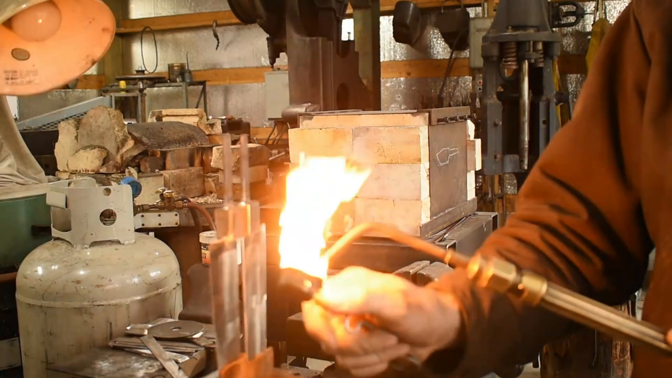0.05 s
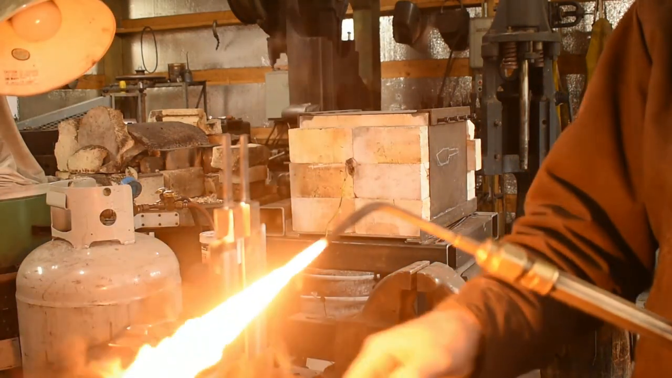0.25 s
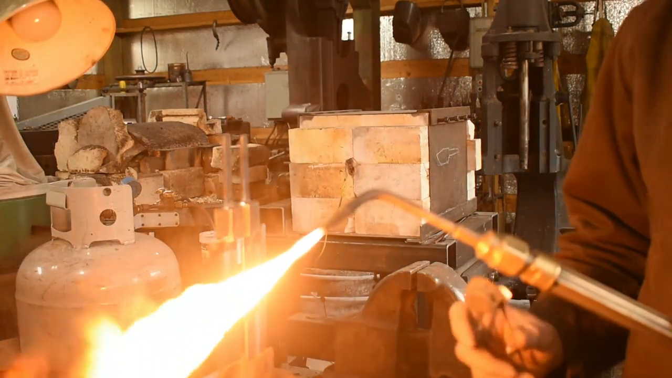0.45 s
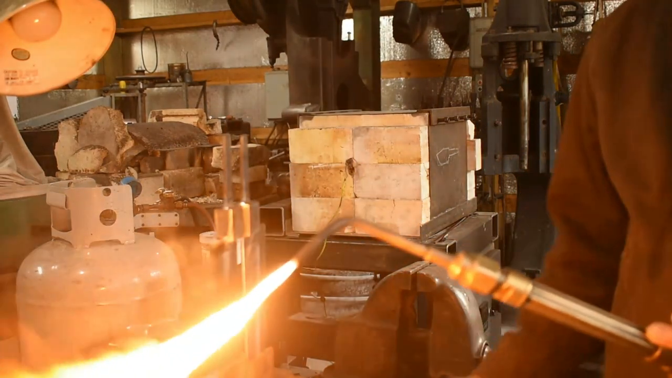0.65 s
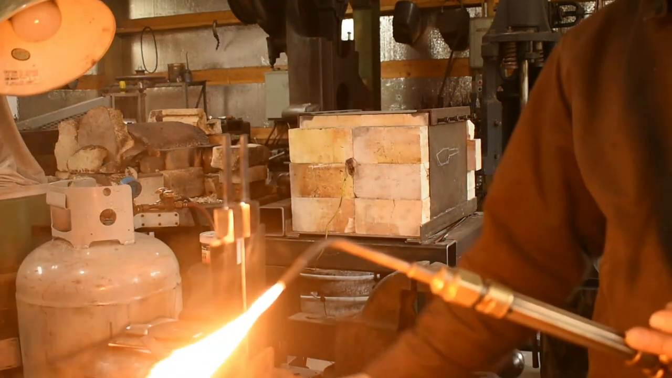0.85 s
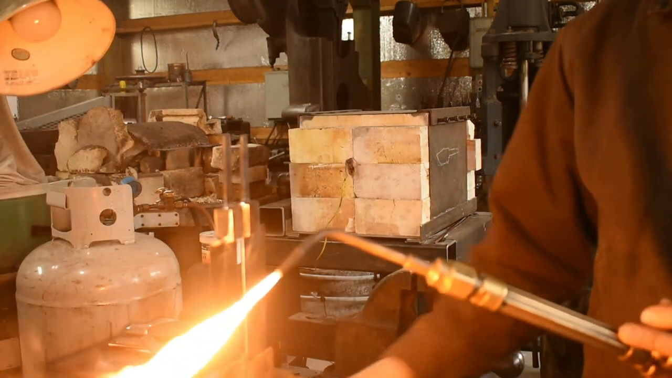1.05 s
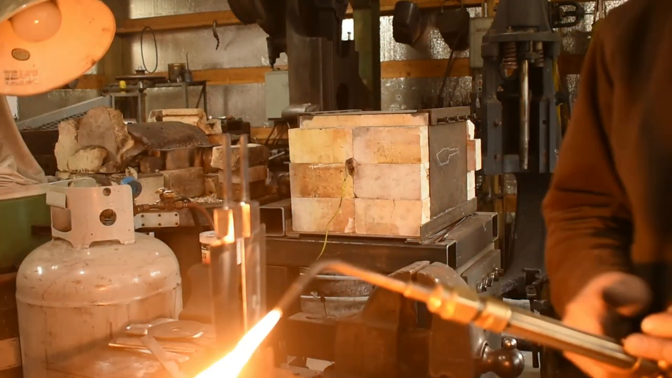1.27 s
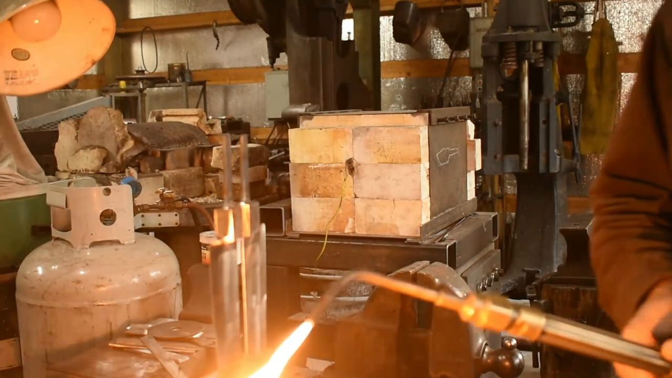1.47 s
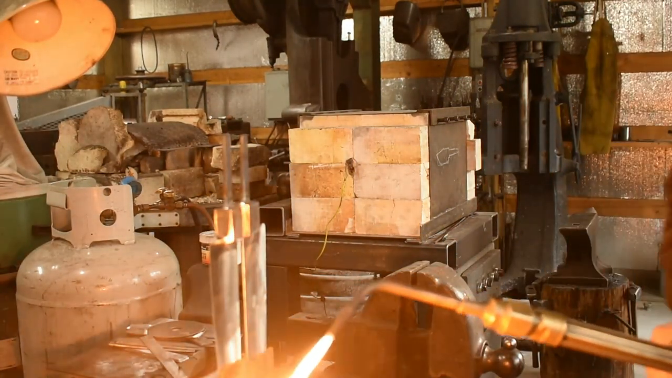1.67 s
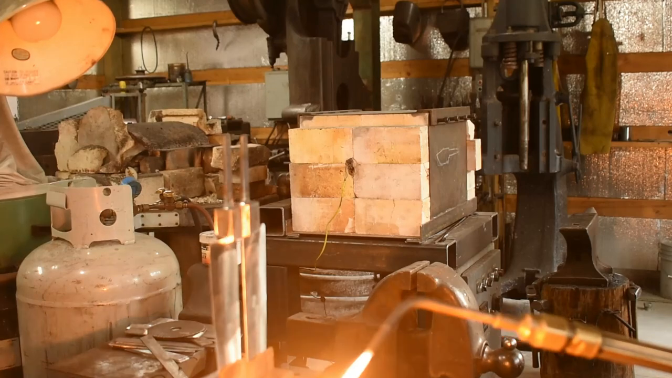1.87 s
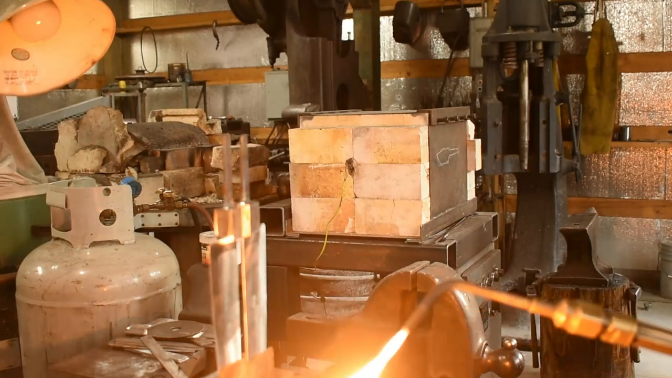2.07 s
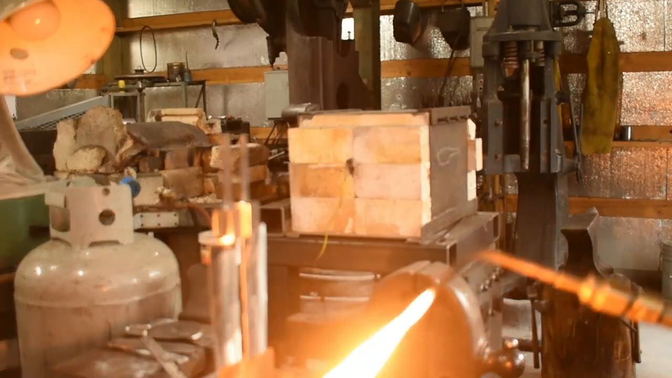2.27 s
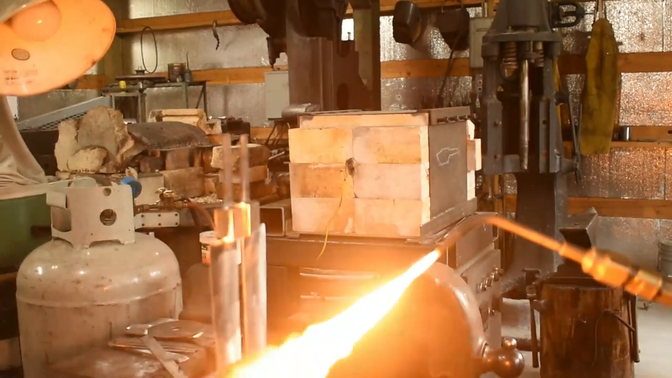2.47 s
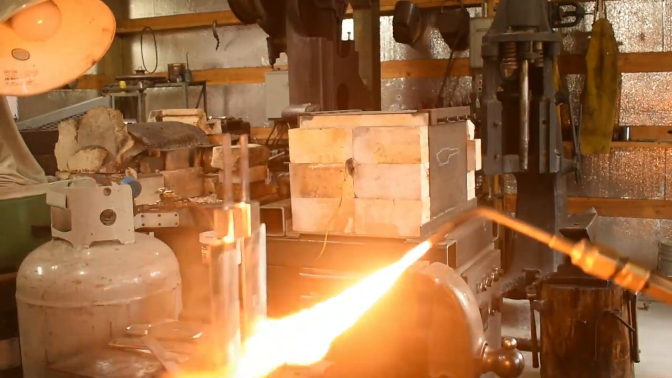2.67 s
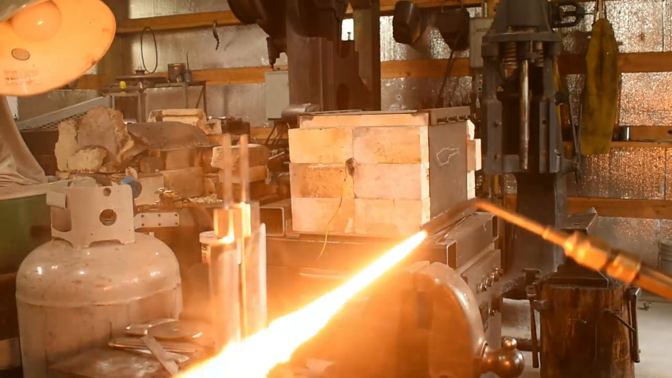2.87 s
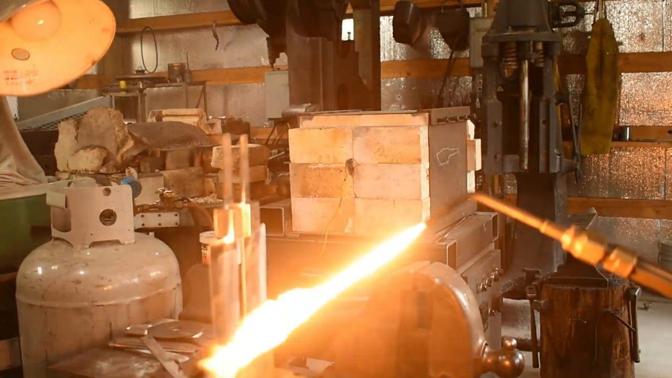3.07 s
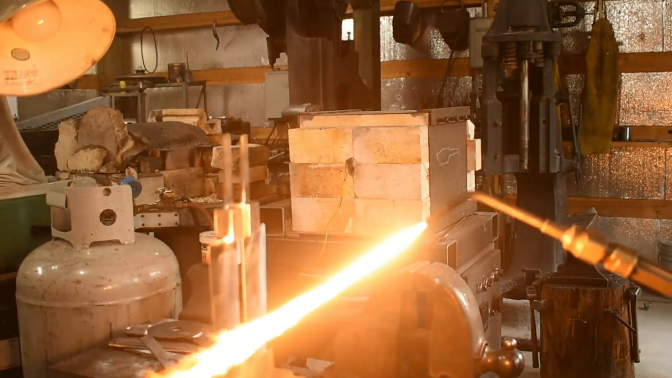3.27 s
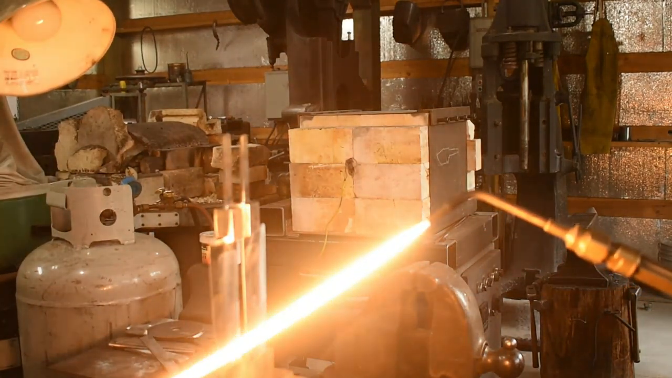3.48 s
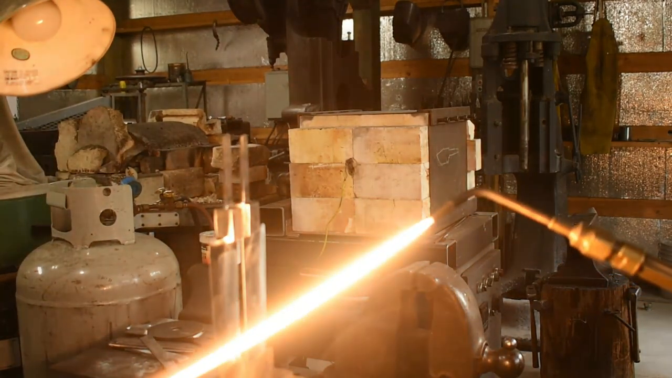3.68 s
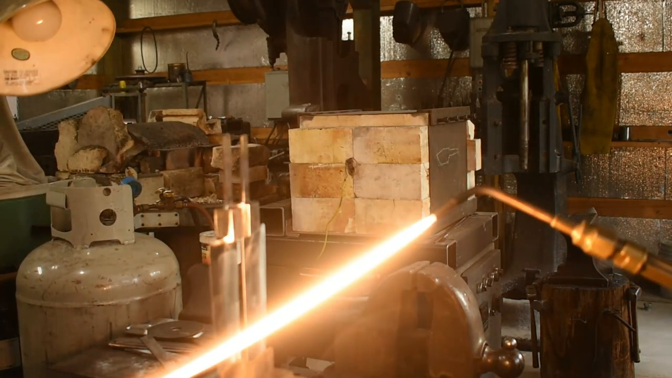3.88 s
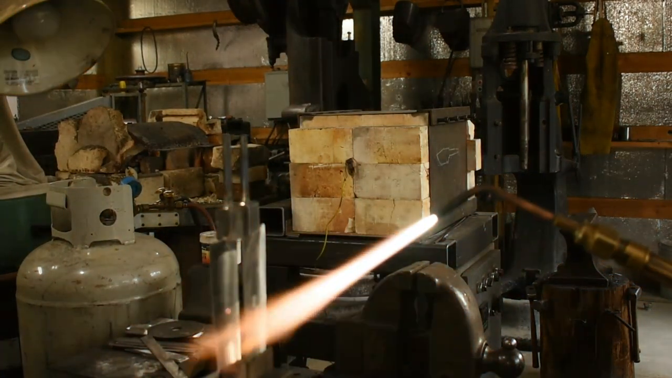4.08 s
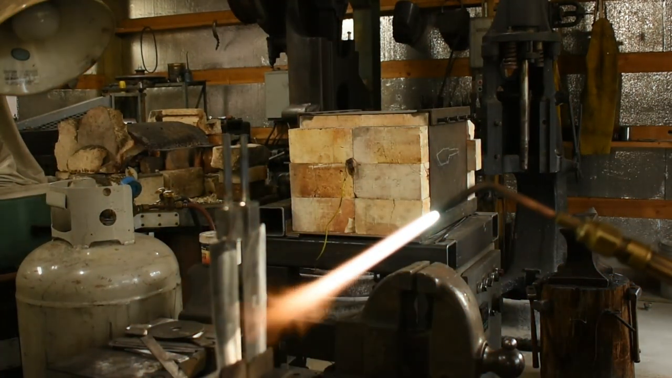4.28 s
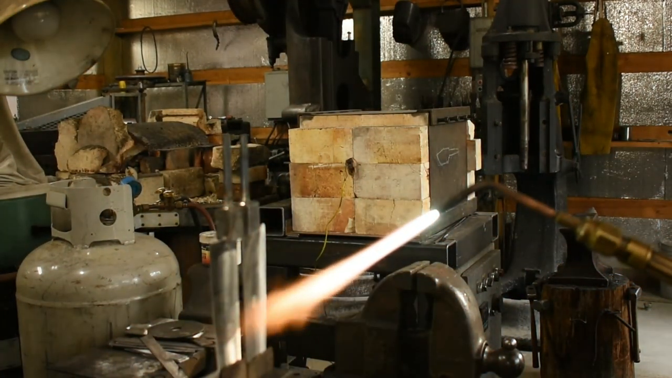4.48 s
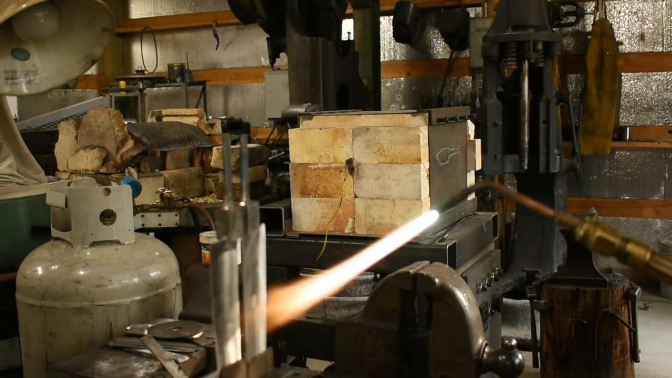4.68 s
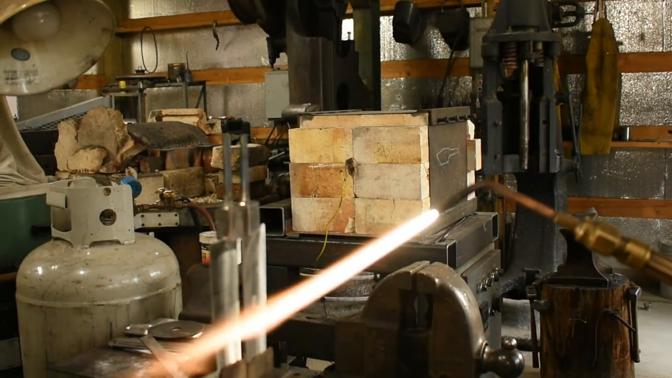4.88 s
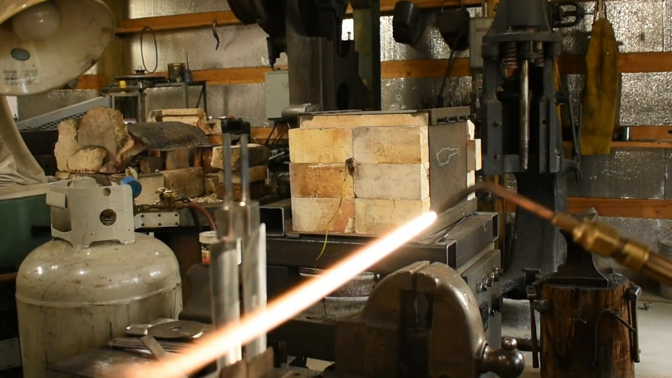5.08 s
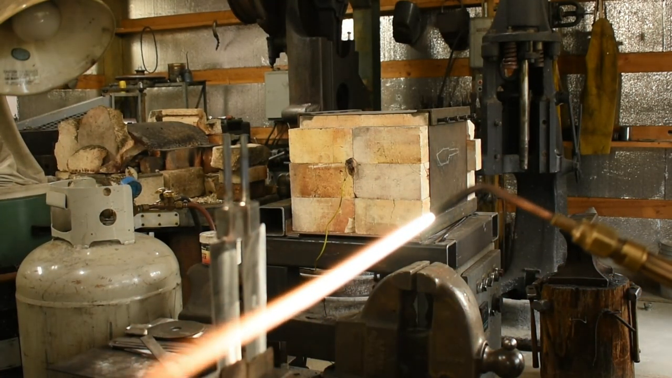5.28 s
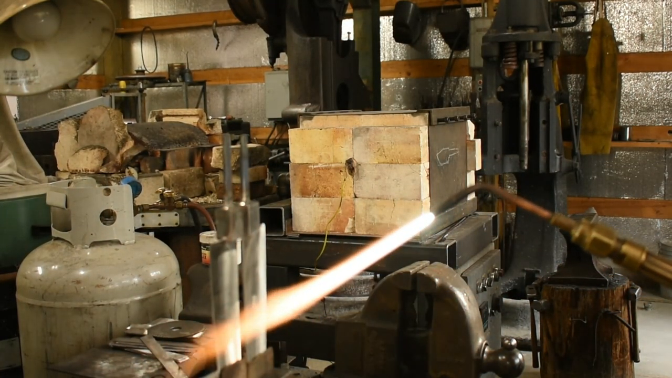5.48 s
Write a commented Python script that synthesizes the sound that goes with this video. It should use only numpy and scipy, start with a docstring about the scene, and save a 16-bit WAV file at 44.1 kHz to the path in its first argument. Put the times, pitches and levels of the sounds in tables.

```python
"""Lighting a gas torch

In a workshop, a flint striker scrapes, the gas goes off with a loud pop, and a flame roars softly.
The striker is dropped and clatters on the steel bench. As the valves are turned the flame sputters,
the nozzle whistles briefly and the flame settles to a quiet hiss. A near echo shifts as the torch moves."""
import sys
import numpy as np
from scipy import signal
from scipy.fft import rfft, irfft
from scipy.io import wavfile
from scipy.ndimage import uniform_filter1d, map_coordinates

SR = 44100
rng = np.random.default_rng(int(sys.argv[2]) if len(sys.argv) > 2 else 0)


def bounce(signal):
    """Save signal as a 16-bit WAV file at the path given by the first command-line argument."""
    frames = np.transpose(np.atleast_2d(signal))
    limited = np.clip(frames, -1, 1)
    pcm = np.round(limited * 32767).astype(np.int16)
    wavfile.write(sys.argv[1], SR, pcm)


N = 244446
TIME = np.arange(N) / SR
LIT_S = 0.067  # when the gas catches fire


def gain_of(db):
    """Turns decibels into a number to multiply by."""
    return 10 ** (np.asarray(db) / 20)


def evened(x):
    """Scales a signal to an average power of 1."""
    return x / np.sqrt(np.mean(x ** 2) + 1e-20)


def read(points, hz):
    """Looks up a frequency in a table, blending between rows on a log scale."""
    frequencies, values = np.transpose(points)
    return np.interp(np.log(hz + 1), np.log(frequencies + 1), values)


def follow(rows):
    """Joins a table's timed points into one curve per column."""
    times, *columns = np.transpose(rows)
    return [np.interp(TIME, times, column) for column in columns]


def gate(start, end, attack_s, release_s):
    """Fades in from 0 to 1, holds until the end, then fades out."""
    return np.clip((TIME - start) / attack_s, 0, 1) * np.clip(1 - (TIME - end) / release_s, 0, 1)


def add(mix, start_s, sound):
    """Mixes a sound in at the given time."""
    part = mix[round(start_s * SR):][:len(sound)]
    part += sound[:len(part)]


def noise(spectrum):
    """Steady noise with the given tone colour (its balance of low and high)."""
    gains = gain_of(read(spectrum, np.fft.rfftfreq(N, 1 / SR)))
    return evened(irfft(rfft(rng.standard_normal(N)) * gains, N))


def colour(x, spectrum, size=4096):
    """Gives a sound a tone colour while keeping its sudden starts sharp."""
    log_gain = np.log(gain_of(read(spectrum, abs(np.fft.fftfreq(size, 1 / SR)))))
    response = np.exp(np.conj(signal.hilbert(log_gain)))  # minimum phase: nothing sounds early
    taps = np.fft.ifft(response).real[:size // 2]
    return signal.oaconvolve(x, taps / np.linalg.norm(taps))[:N]


def wander(hz):
    """A smooth random wobble, up to about hz changes a second."""
    smoothing = np.exp(-(np.fft.rfftfreq(N, 1 / SR) / hz) ** 2)
    return evened(irfft(rfft(rng.standard_normal(N)) * smoothing, N))


def burst(decay_s):
    """A puff of noise that starts at once and dies away."""
    t = TIME[:SR // 10]
    return rng.standard_normal(len(t)) * np.exp(-t / decay_s)


def ring(tones, detune=.004):
    """A struck object rings with its own fading tones, a little differently at each blow."""
    t = TIME[:SR]
    phases = rng.random(len(tones))
    shifts = 1 + detune * rng.standard_normal(len(tones))
    return sum(gain_of(db - 60 * t / fade_s) * np.sin(2 * np.pi * (hz * shift * t + phase))
               for (hz, db, fade_s), phase, shift in zip(tones, phases, shifts))


# tone colour of the flowing gas: (frequency [Hz], level [dB])
FLOW_COLOUR = [(25, -14), (60, -14), (100, -25), (220, -16.5), (420, 1.5), (700, -0.5), (1200, -3.5),
               (2000, -9.5), (3000, -17.5), (4000, -15), (6500, -26), (15000, -37)]
def gas_flow(level_db=-53):
    """Cold gas rushes softly out of the tip the whole time."""
    return gain_of(level_db) * noise(FLOW_COLOUR)


def flint_stroke(start, length, db, swell_db, grip_s=.0027, slip_s=.0023):
    """How hard the flint rubs: it grips, swells or eases along the file, and slips off."""
    t = TIME - start
    along = np.clip(t / length, 0, 1)
    grip = np.clip(t / grip_s, 0, 1)
    slip = np.exp(-np.maximum(t - length, 0) / slip_s)
    return grip * gain_of(db + swell_db * (along - 1)) * slip


# a touch and a stroke each way: (start [s], length [s], final level [dB], swell on the way [dB])
FLINT_STROKES = [(0.029, 0.0036, -46.5, 3), (.058, .013, -25, -7.5), (0.165, .004, -41, 3),
                 (.182, .027, -22, 19.5)]
# tone colour of flint on the file: (frequency [Hz], level [dB])
SCRAPE_COLOUR = [(500, -34), (2000, -2.5), (3200, 0), (4700, 3), (6000, -10), (7500, -9), (10000, -13),
                 (16000, -17)]
def striker(cup_hz=7330, cup_decay_s=.0019, cup_db=-1, freed_s=.16, grit_db=1.1, room_db=-11):
    """Flint grates over the file and rings the striker's steel cup."""
    rubbing = gain_of(grit_db * wander(hz=700)) * sum(flint_stroke(*row) for row in FLINT_STROKES)
    keep = np.exp(-2 / (cup_decay_s * SR))
    stored_energy = signal.lfilter([1 - keep], [1, -keep], rubbing ** 2 + 1e-18)
    freed = np.where(TIME > freed_s, 1, .4)  # the closed hand muffles the cup until the return stroke
    cup = gain_of(cup_db) * freed * np.sqrt(stored_energy) * np.sin(2 * np.pi * cup_hz * TIME)
    dry = rubbing * noise(SCRAPE_COLOUR) + cup
    return dry + gain_of(room_db) * workshop_echo(dry)


# the gas cloud goes off in two quick thumps: (time [s], strength [dB])
THUMPS = [(0.0672, 18), (0.0703, 12)]
# tone colour of the bang: (frequency [Hz], level [dB])
BANG_COLOUR = [(30, -52), (90, -30.5), (140, -1.5), (190, 8), (320, -4), (600, 4), (1450, -5.5),
               (2100, 3.5), (3000, -9), (4500, -22), (7000, -47), (16000, -60)]
# what the bang sets booming in the workshop: (frequency [Hz], level [dB], time to fade 60 dB [s])
BOOM_TONES = [(139.6, -3, 0.29), (188.5, 5, 0.1), (232, -8, 0.28), (308, 1.5, 0.14), (473, 1, 0.22),
              (866, 13, 0.062), (1200, 9, 0.065), (2140, -5, 0.26)]
def ignition(rush_db=-25, rush_s=.0058, boom_db=-23, room_db=-8):
    """Each thump is a pressure spike with a short rush of air behind it; the workshop booms."""
    blast, boom = np.zeros((2, N))
    for s, db in THUMPS:
        add(blast, s, gain_of([db]))
        add(blast, s, gain_of(db + rush_db) * burst(rush_s))
    add(boom, LIT_S, gain_of(boom_db) * ring(BOOM_TONES))
    dry = colour(blast, BANG_COLOUR)
    return dry + boom + gain_of(room_db) * workshop_echo(dry)


# tone colour of the yellow flame, rich in fuel: (frequency [Hz], level [dB])
RICH_COLOUR = [(30, -25), (70, -35), (110, -19), (150, -16.5), (200, -8), (255, -7.5), (315, 1), (410, -1),
               (660, -0.5), (900, 1), (1250, -4.5), (1550, -3.5), (2200, -11), (5000, -73)]
# tone colour of the lean flame, which has more oxygen: (frequency [Hz], level [dB])
LEAN_COLOUR = [(30, -31), (80, -26), (140, -12), (210, -4.5), (260, -2.5), (340, 2.5), (480, -2.5),
               (690, -4.5), (950, -1), (1500, -20.5), (4000, -47)]
def roar(rich_db=-36.5, peak_s=1.5, lean_db=-45.5, lean_start_s=4.12, flutter_db=1.6, murmur_db=-61.5):
    """The flame roars broadly until the gas is turned down; more oxygen brings a deeper, hollow roar."""
    rich_level = rich_db - 1.37 * abs(TIME - peak_s)  # 1.37 dB a second, up and then down
    rich = gate(LIT_S, 3.37, attack_s=.15, release_s=.13) * gain_of(rich_level)
    lean_level = lean_db - 5.5 * (TIME - lean_start_s) + flutter_db * wander(hz=20)
    lean = gate(lean_start_s, 4.92, attack_s=.074, release_s=.1) * gain_of(lean_level)
    lean = np.hypot(lean, gain_of(murmur_db))  # a murmur of it is always there
    return rich * noise(RICH_COLOUR) + lean * noise(LEAN_COLOUR)


# the flame at the tip as the valves are turned: (time [s], rasp level [dB], hiss level [dB])
TIP_LEVELS = [(.35, -48.5, -63), (1.02, -40, -55.5), (1.68, -44, -55.5), (1.9, -39, -59), (2.3, -44, -59.5),
              (2.7, -45, -60), (2.92, -38, -55.5), (3.17, -44.5, -62.5), (3.5, -40.5, -65),
              (4.07, -42.5, -60), (4.18, -53, -47), (4.32, -47, -44), (4.72, -48.5, -48), (5.1, -54, -57.5),
              (5.52, -62.5, -68.5)]
# brief flare-ups: (time [s], half length [s], roar change [dB], rasp change [dB], hiss change [dB])
FLARE_UPS = [(.55, 0.036, 0.5, 3, 4.5), (2.818, 0.045, 7, 6, 11), (3.116, 0.058, 1, 0, 9.5),
             (3.326, 0.03, -1, 5, 3), (4.025, .05, -3, 1.5, 6), (4.368, 0.0099, 7, -5, 0),
             (4.93, 0.018, 4.5, -3, 0), (5.21, 0.028, 0, 0, 7)]
# tone colour of the rasp at the tip: (frequency [Hz], level [dB])
RASP_COLOUR = [(100, -56), (300, -49), (1000, -9), (1550, -3), (1850, 4), (2400, 3.5), (3100, -1.5),
               (4000, -4), (4900, -8.5), (6000, -19.5), (9000, -39), (16000, -68)]
# tone colour of the hissing jet: (frequency [Hz], level [dB])
HISS_COLOUR = [(100, -50), (1000, -45), (2500, 1.5), (4000, 8), (5500, 4.5), (7000, 2), (9000, -2),
               (11000, -6.5), (14000, -14.5), (16000, -32)]
def flame(hiss_boost_db=1.5, flutter_db=1.0, drift_db=.5, grow_s=.14):
    """Swirling, burning gas roars, flares and flutters, with a rasp and a hiss at the tip."""
    rasp_db, hiss_db = follow(TIP_LEVELS)
    roar_rise, rasp_rise, hiss_rise = sum(np.outer(rises, np.exp(-((TIME - s) / half_s) ** 2))
                                          for s, half_s, *rises in FLARE_UPS)
    body = gain_of(roar_rise) * roar()
    crackle, fizz = sputtering() * rng.standard_normal((2, N))
    rasp = gain_of(rasp_db + rasp_rise) * colour(crackle, RASP_COLOUR)
    hiss = gain_of(hiss_db + hiss_boost_db + hiss_rise) * colour(fizz, HISS_COLOUR)
    alight = np.clip((TIME - LIT_S) / grow_s, 0, 1)
    flutter = gain_of(flutter_db * wander(hz=35))
    drift = gain_of(drift_db * wander(hz=5))
    return alight * flutter * (body + drift * (rasp + hiss))


# the striker lands, rocks and falls flat: (time [s], strength [dB], share that is a dull knock [0-1])
BOUNCES = [(1.103, -26, 0), (1.107, -3.5, 0.01), (1.112, 0.5, 0.02), (1.119, 1, 0.06), (1.131, -6, 0.53),
           (1.146, -3.5, 0.32), (1.161, -5, 0.82), (1.368, -8, 0.1), (1.374, -7, 0.06), (1.392, -11, 0.85),
           (1.411, -12.5, 0.8), (1.423, -10.5, 1), (1.45, -19, 1)]
# tone colour of steel hitting steel: (frequency [Hz], level [dB])
CLACK_COLOUR = [(30, -11), (120, -28), (300, -15), (700, -7), (1500, -4), (2700, -0.5), (4400, 3),
                (6000, -2.5), (8500, -6.5), (12000, -10.5), (16000, -22)]
# tone colour of the dull bench top: (frequency [Hz], level [dB])
KNOCK_COLOUR = [(30, -45), (120, -43), (300, -1.5), (700, -2), (1200, 0.5), (2600, 0), (4500, -6),
                (9000, -30), (16000, -29)]
# the ringing of striker and bench: (frequency [Hz], level [dB], time to fade 60 dB [s])
STEEL_TONES = [(1081, -1, 0.22), (1830, -7, 0.26), (1995, -3.5, 0.2), (2766, 3, 0.39), (2780, -2, 0.2),
               (3870, -5, 0.3), (4270, 2, 0.27), (4900, -14, 0.28), (5490, -10.5, 0.6), (6440, -12, 0.6),
               (6580, -2.5, 0.32), (8470, -9.5, 0.54), (8620, -10, .35), (9100, -1, 0.19),
               (10400, -30, .33), (11406, -2, 0.14), (13300, -21, 0.53)]
def clatter(clack_db=-13.5, clack_s=.0095, ring_db=-29, room_db=-3):
    """Each bounce of the dropped striker clacks, knocks the bench and leaves the steel ringing."""
    clacks, knocks, rings = np.zeros((3, N))
    for s, db, dull in BOUNCES:
        add(clacks, s, gain_of(db + clack_db) * np.sqrt(1 - dull) * burst(clack_s))
        add(knocks, s, gain_of(db + clack_db) * np.sqrt(dull) * burst(clack_s))
        add(rings, s, gain_of(db + ring_db) * (1 - dull) * ring(STEEL_TONES))
    dry = colour(clacks, CLACK_COLOUR) + colour(knocks, KNOCK_COLOUR)
    return dry + rings + gain_of(room_db) * workshop_echo(dry)


def sputtering(snaps_per_s=370, snap_s=.0012, spread_db=2.0, ceiling=10):
    """Two loudness curves, for rasp and hiss: part steady, part a stream of tiny explosions."""
    sizes = gain_of(spread_db * np.minimum(rng.exponential(1, N), 3))
    snaps = sizes * (rng.random(N) < snaps_per_s / SR)
    power = abs(signal.lfilter([1], [1, -np.exp(-2 / (snap_s * SR))], snaps ** 2))
    power = np.array([power, power ** 4])  # bigger explosions are also brighter
    average = abs(uniform_filter1d(power, SR // 10, axis=1)) + 1e-9
    power = ceiling * np.tanh(power / average / ceiling)  # only so much gas can go off at once
    power /= power.mean(axis=1, keepdims=True)
    calm, unsteady, whistling = .05, .93, .33  # share of the power that comes in explosions
    share = calm + (unsteady - calm) * gate(3.15, 5.45, attack_s=.066, release_s=.32)
    share += (whistling - share) * gate(*WHISTLE_SPAN)  # the fast jet steadies the flame
    return np.sqrt(1 - share + share * power)


# the flame's loudest spits: (time [s], strength [dB])
LOUD_SPITS = [(3.1944, -28.5), (3.256, -28), (3.2752, -24), (3.3354, -28), (3.4186, -29), (3.4334, -31),
              (3.478, -26), (3.5343, -25.5), (3.5488, -24.5), (3.6424, -24), (3.6686, -26), (3.7682, -24),
              (3.8215, -27), (3.8763, -24), (3.929, -24.5), (3.9709, -20.5), (3.9886, -20), (4.004, -27),
              (4.0423, -24), (4.072, -23), (4.1687, -28), (4.5231, -28.5), (4.9401, -29), (5.0466, -27),
              (5.1538, -32), (5.1968, -29), (5.2131, -27.5), (5.238, -31), (5.2889, -32), (5.4525, -36)]
# tone colour of a spit: (frequency [Hz], level [dB])
SPIT_COLOUR = [(60, -60), (300, -17), (1200, -8), (2000, 0.5), (4000, 5.5), (6000, -2), (9000, -13.5),
               (12000, -22.5), (16000, -36)]
def spits(gain_db=-2.5, decay_s=.0011):
    """The flame lifts off the tip and snaps back."""
    puffs = np.zeros(N)
    for s, db in LOUD_SPITS:
        add(puffs, s, gain_of(db + gain_db) * burst(decay_s))
    return colour(puffs, SPIT_COLOUR)


WHISTLE_SPAN = (4.245, 4.77, .027, .15)  # (start [s], end [s], fade in [s], fade out [s])
# each turn of the oxygen valve pulls the whistle higher: (time [s], pitch rise [Hz])
OXYGEN_TURNS = [(4.246, 2550), (4.6, 1664)]
def whistle(base_hz=4850, settle_s=.09, width_hz=240, level_db=-47, sag_db_per_s=13, octave_db=-15):
    """Gas rushing past the nozzle's edge makes a breathy tone, with a faint one an octave above."""
    hz = base_hz + sum(rise * (1 - np.exp(-np.maximum(TIME - s, 0) / settle_s))
                       for s, rise in OXYGEN_TURNS)
    tone = np.exp(2j * np.pi * np.cumsum(hz) / SR)
    breath = wander(width_hz) + 1j * wander(width_hz)
    octave_breath = wander(2 * width_hz) + 1j * wander(2 * width_hz)
    blowing = gate(*WHISTLE_SPAN) * gain_of(level_db - sag_db_per_s * (TIME - WHISTLE_SPAN[0]))
    last_turn_s = OXYGEN_TURNS[-1][0]
    octave_gain = gain_of(octave_db) * np.clip(1 - (TIME - last_turn_s) / .05, 0, 1)  # gone in 50 ms
    return blowing * (breath * tone + octave_gain * octave_breath * tone ** 2).real


# how late the nearest echo arrives as the torch moves: (time [s], delay [ms])
ECHO_DELAYS = [(0.2, 1.64), (0.55, 1.84), (1.05, 1.72), (1.65, 1.91), (2.55, 1.89), (3.0, 1.71),
               (5.4, 1.75)]
def near_echoes(x, near_gain=.4, phase_turn_rad=.93, far_gain=.22, far_ms=5.87):
    """Echoes off two close surfaces boost some pitches and cancel others; these slide as the torch moves."""
    def delayed(sound, ms):
        return map_coordinates(sound, [(TIME - ms / 1000) * SR], order=3)
    glancing = (signal.hilbert(x) * np.exp(1j * phase_turn_rad)).real
    near = near_gain * delayed(glancing, follow(ECHO_DELAYS)[0])
    far = far_gain * delayed(x, far_ms)
    return (x + near + far) / np.sqrt(1 + near_gain ** 2 + far_gain ** 2)


# how long sound lingers in the workshop: (frequency [Hz], time to fade 60 dB [s])
ROOM_FADES = [(100, 0.53), (250, 0.46), (700, 0.24), (2500, 0.34), (6000, 0.33), (15000, 0.28)]
def workshop_echo(x, gap_s=.005):
    """The room's many echoes blur into a tail in which each pitch fades at its own speed."""
    echoes = rng.standard_normal(SR) * (TIME[:SR] > gap_s)
    hz, t, bands = signal.stft(echoes, SR, nperseg=256)
    fading = gain_of(-60 * t / read(ROOM_FADES, hz)[:, None])
    _, tail = signal.istft(bands * fading, SR, nperseg=256)
    return signal.fftconvolve(x, tail / np.linalg.norm(tail))[:N]


def scene(room_db=-11):
    """The torch and its echoes, with the scrape, the pop and the clatter, in one channel."""
    torch = near_echoes(flame() + spits() + whistle() + gas_flow())
    return (torch + gain_of(room_db) * workshop_echo(torch) + striker() + ignition() + clatter())[None]


def record(dry, low_cut_hz=85, high_cut_hz=15900):
    """The bang overloads the microphone; the deepest bass and highest treble are cut away."""
    clipped = np.clip(dry, -.9, .9)
    thinned = signal.sosfilt(signal.butter(2, low_cut_hz, "high", fs=SR, output="sos"), clipped)
    treble_cut = signal.firwin(401, high_cut_hz, window=("kaiser", 9), fs=SR)
    return signal.oaconvolve(thinned, treble_cut[None], "same")


dry = scene()
out = record(dry)
bounce(out)
```